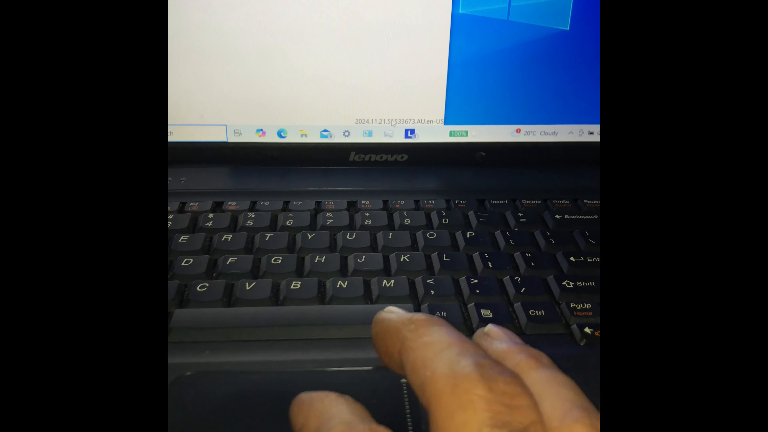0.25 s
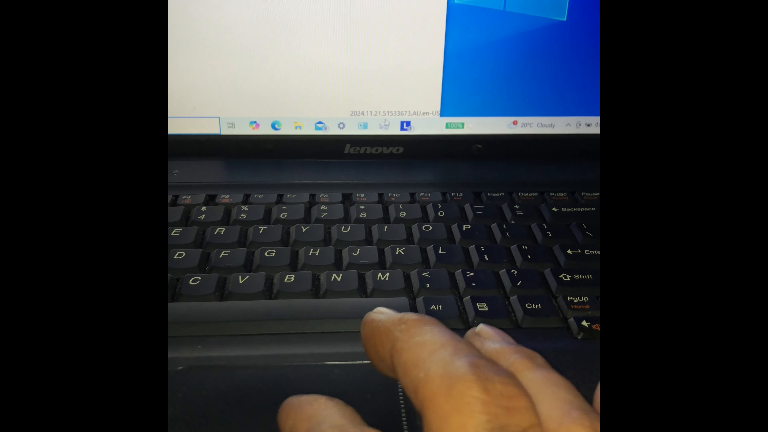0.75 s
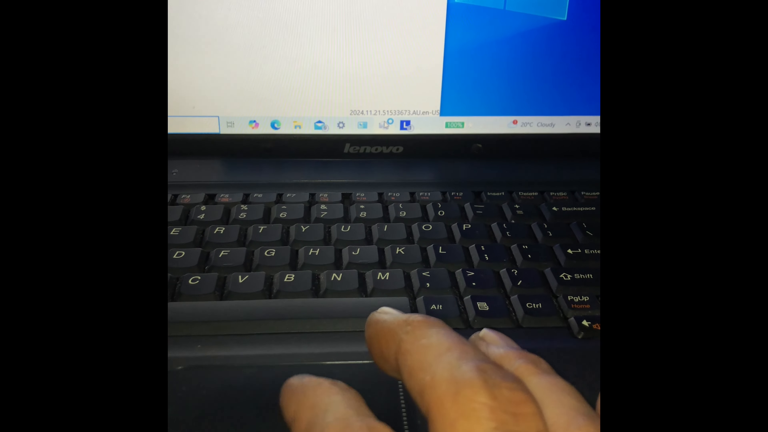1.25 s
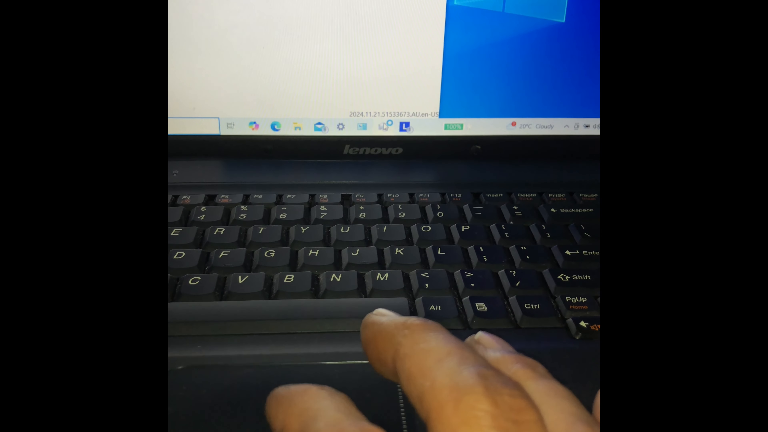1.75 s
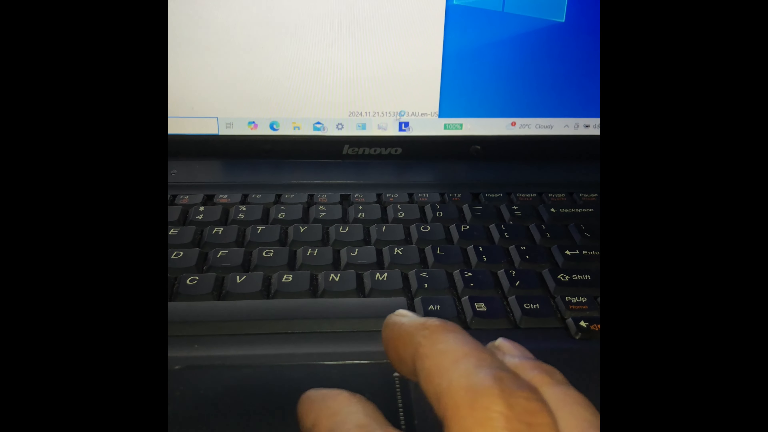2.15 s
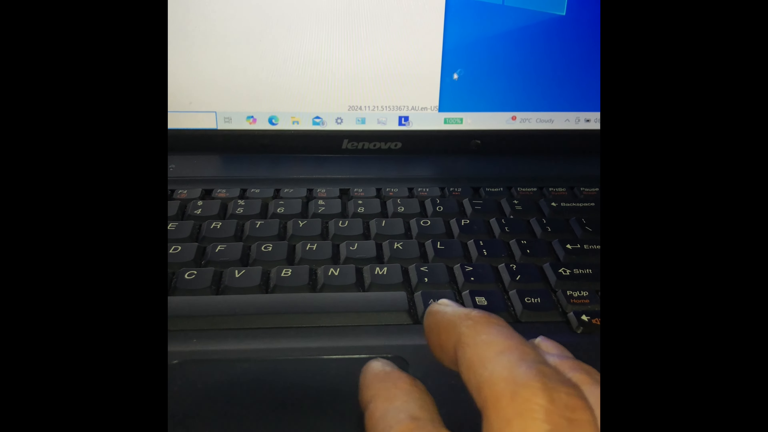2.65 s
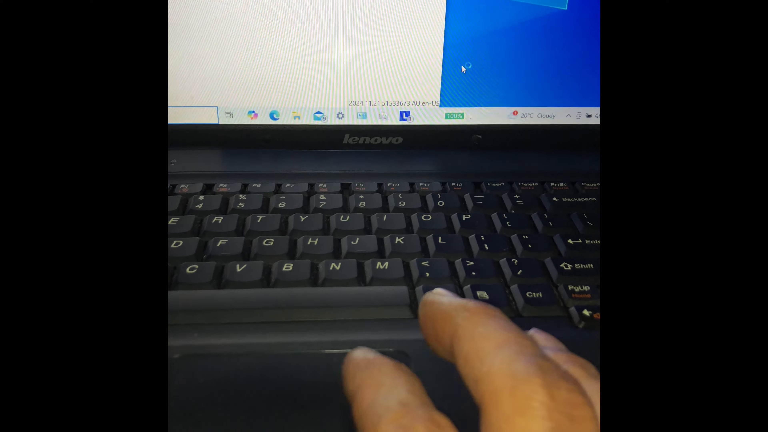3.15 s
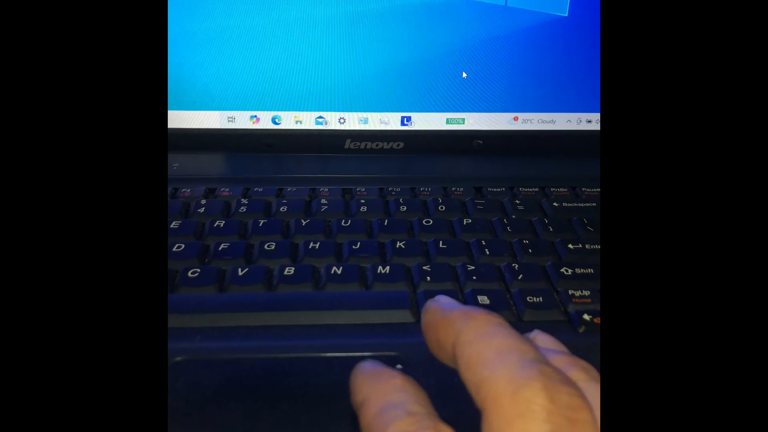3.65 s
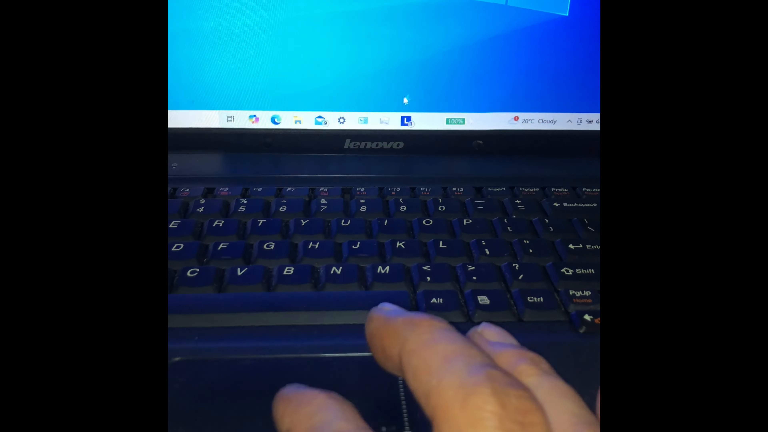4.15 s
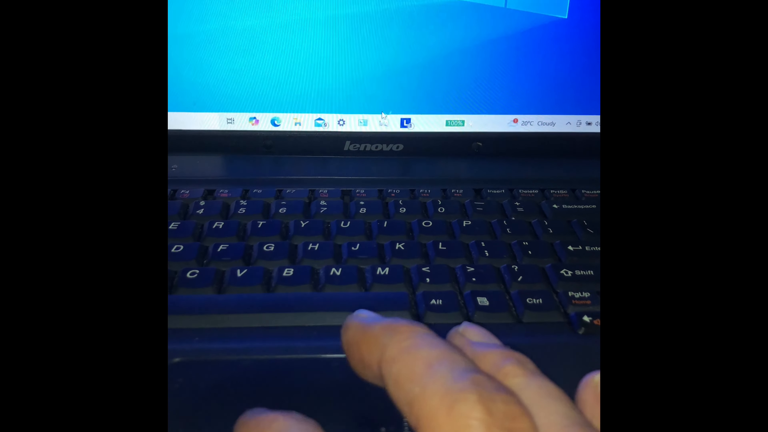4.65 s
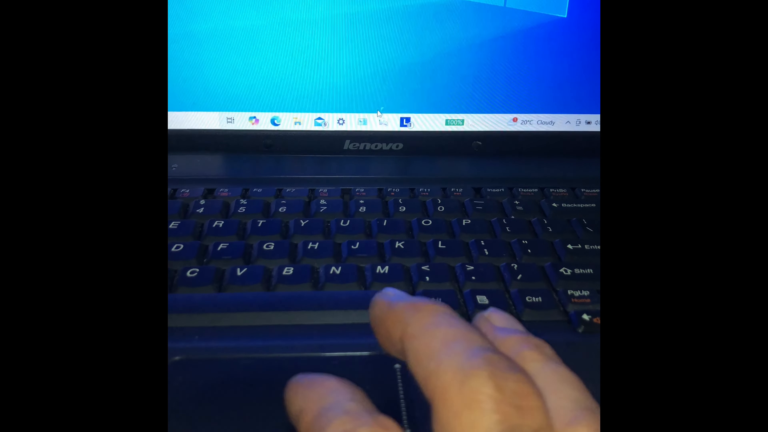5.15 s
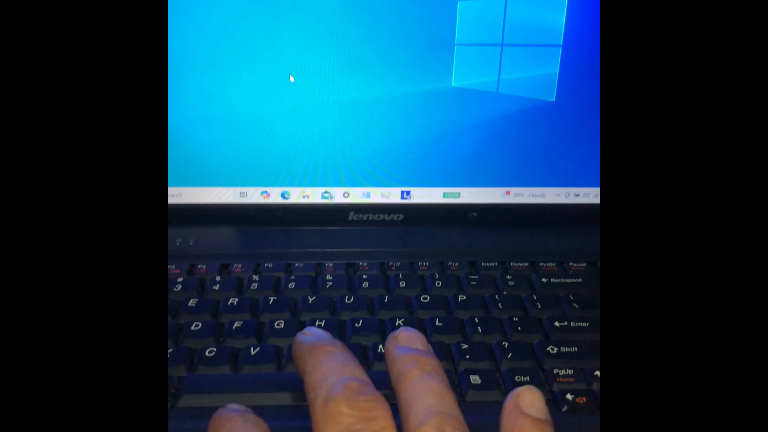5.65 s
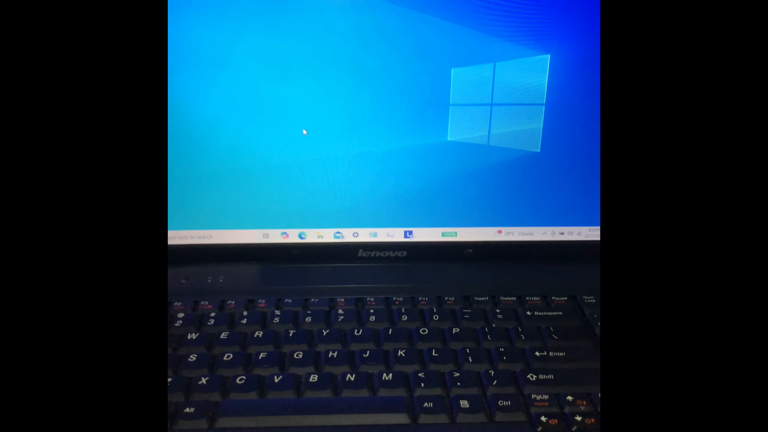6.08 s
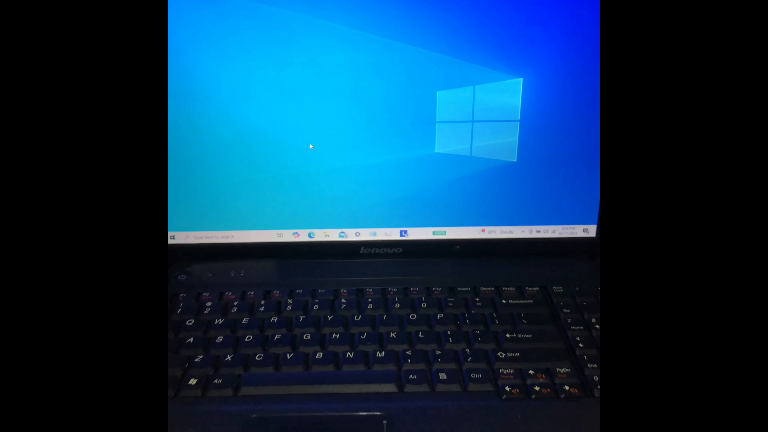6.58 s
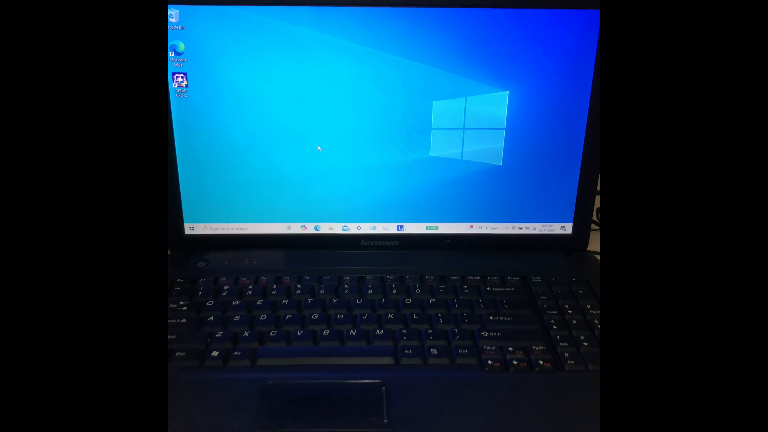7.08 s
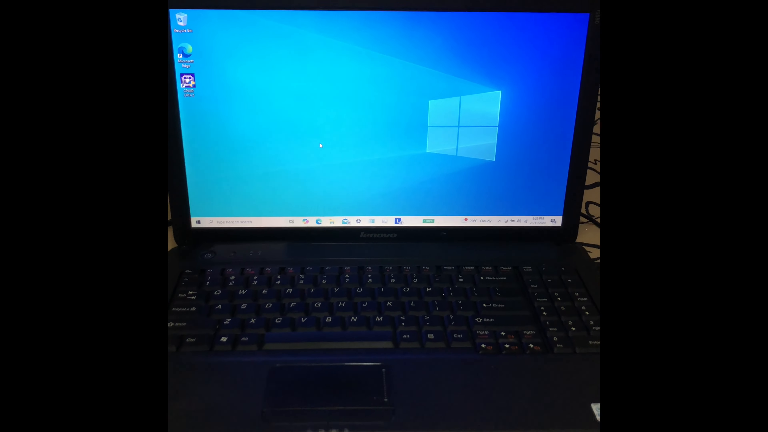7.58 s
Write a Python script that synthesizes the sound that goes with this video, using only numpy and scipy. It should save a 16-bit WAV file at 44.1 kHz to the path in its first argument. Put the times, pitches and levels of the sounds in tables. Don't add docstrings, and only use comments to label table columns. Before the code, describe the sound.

A constant small fan, captured by a nearby phone-like microphone indoors, blends breathy airflow, deep wavering drone, hum and a rough nasal whine. For the first five seconds almost nothing else happens beyond one faint click. Then cloth brushes in hissing strokes, loudest just after six seconds, followed by rapid knocky plastic creaks that thin out while the fan keeps running.

```python
import sys
import numpy as np
from scipy import signal
from scipy.fft import rfft, irfft
from scipy.io import wavfile
from scipy.ndimage import uniform_filter1d

SR = 44100
rng = np.random.default_rng(int(sys.argv[2]) if len(sys.argv) > 2 else 0)


def gain_from_db(level_db):
    decades = np.asarray(level_db, float) / 20
    return 10 ** decades


def wrap_up_sound(samples):
    columns = np.atleast_2d(samples).T
    tamed = np.clip(columns, -1, 1)
    steps = np.round(tamed * 32767).astype(np.int16)
    wavfile.write(sys.argv[1], SR, steps)


N = 344853


def level(x, db):
    return x * gain_from_db(db) / np.sqrt(np.mean(x ** 2))


def walk(rate):
    k = int(SR / rate)
    held = np.repeat(rng.standard_normal(N // 100), k)[:N + k]
    return 1.22 * uniform_filter1d(uniform_filter1d(held, k), k)[:N]


def coloured(table, modes=()):
    hz = np.arange(1, N // 2 + 2) * SR / N
    table_hz, table_db = np.array(table).T
    gain = gain_from_db(np.interp(np.log(hz), np.log(table_hz), table_db))
    for centre_hz, width_hz, lift_db in modes:
        gain = gain * gain_from_db(lift_db / (1 + (2 * (hz - centre_hz) / width_hz) ** 2))
    return irfft(rfft(rng.standard_normal(N)) * gain, N)


def leaning_back(t):
    return np.interp(t, (5.1, 7.3), (0, 1))


def air():
    # frequency in Hz, level in dB per Hz.
    bare_air = [(20, -46), (36, -33), (52, -18.5), (90, -11), (230, -6.5), (380, -19.5), (500, -24.5),
                (790, -28.5), (1050, -27), (1800, -30), (2150, -36), (3600, -36.5), (6000, -43.5),
                (15500, -56)]
    # frequency in Hz, width in Hz, lift in dB (negative for a
    resonances = [(53.7, 6.7, 10), (80.4, 6.7, 5.5), (131.3, 25.6, 10.5), (174, 11, -2), (335, 24.3, 6),
                  (443, 94, 2), (544.6, 17, 7.5), (612, 28, 3.5),
                  (1022, 28, 5), (1104, 49, 6), (1316, 27, 4.5), (1435, 42, 7.5), (1594, 75, 7.5),
              (1737, 29, 7.5), (1877, 37, 4), (2512, 33, 4), (3070, 110, 3.5), (4220, 1170, 2),
              (5320, 560, -1), (7500, 940, 1.5), (8700, 1200, -1.5), (10500, 2000, 0.5)]
    # time in seconds, lift in dB (negative for a
    surge_table = [(0.0, 1.5), (.37, -3), (.91, 2), (1.22, -4), (2.29, 4.5), (2.77, -3.5), (3.04, 3),
                   (4.0, -2), (4.36, 3.5), (5.06, -3), (5.86, 3), (7.01, 0), (7.4, 2.5), (7.6, -2),
                   (7.8, 8)]
    surge_s = 0.12
    ripple_db, ripple_hz = 1.1, 28

    rush = rfft(coloured(bare_air, resonances))
    hz = np.arange(len(rush)) * SR / N
    ripple = np.interp(hz, np.arange(2000) * ripple_hz, rng.standard_normal(2000))
    rush = rush * gain_from_db(ripple_db * ripple * (hz > 1900))

    drone = np.exp(-((hz - 135) / 30) ** 2)
    rumble = (1 - drone) * np.exp(-((hz - 250) / 100) ** 4)
    hiss = 1 - drone - rumble

    t = np.arange(N) / SR
    lean = leaning_back(t)
    surges = sum(db * np.exp(-((t - s) / surge_s) ** 2) for s, db in surge_table)
    drone_db = surges - surges.mean()
    rumble_db = -1.5 * lean + 0.86 * walk(3.06)
    hiss_db = -0.9 * lean + 0.16 * walk(2.6)
    out = gain_from_db(drone_db) * irfft(rush * drone, N)
    out = out + gain_from_db(rumble_db) * irfft(rush * rumble, N)
    out = out + gain_from_db(hiss_db) * irfft(rush * hiss, N)
    return level(out, -46)


def motor():
    # multiple of the magnetic pull, shaft turns added,
    # level in dB at rest, level in dB when the listener has leant back.
    hum = [
        (1, 0, -60.5, -61),
        (2, 0, -63, -61.5),
        (4, -1, -64, -70),
        (4, 0, -60.5, -63),
        (4, 1, -55.3, -53),
    ]
    # frequency in Hz, level in dB, wander in Hz.
    whistles = [(717.06, -81, .2), (882.5, -80.5, .2), (1623.3, -78, .6), (2088.4, -86, .5)]
    pull_hz, shaft_hz = 100.015, 22.11

    t = np.arange(N) / SR
    lean = leaning_back(t)
    pull = pull_hz * t + rng.random()
    shaft = shaft_hz * t + rng.random()
    out = 0
    for multiple, turns, near_db, far_db in hum:
        cycles = multiple * pull + turns * shaft
        tone_db = near_db + lean * (far_db - near_db) + 0.45 * walk(3.5)
        out = out + gain_from_db(tone_db) * np.sin(2 * np.pi * cycles)
    for hz, db, wander_hz in whistles:
        cycles = np.cumsum(hz + wander_hz * walk(1.47)) / SR
        out = out + gain_from_db(db + 2.0 * walk(1.8)) * np.sin(2 * np.pi * cycles)
    return np.sqrt(2) * out


def stroke(t, start_s, attack_s, hold_s, release_s):
    rise = np.sin(np.pi / 2 * np.clip((t - start_s) / attack_s, 0, 1)) ** 2
    return rise * np.exp(-np.maximum(t - start_s - attack_s - hold_s, 0) / release_s)


def sleeve():
    # frequency in Hz, level in dB per Hz.
    cloth = [(600, -20), (1300, 9), (2300, -4), (3500, 0.5), (6000, -2.5), (10000, -5.5), (13000, -9.5),
             (15500, -9.5)]
    # start in seconds, attack in seconds, hold in seconds,
    # release in seconds, level in dB above 5 kHz.
    strokes = [
        (5.05, 0.18, 0.18, .3, -76.5),
        (5.96, 0.22, .04, .25, -66),
        (6.15, 0.1, .02, 0.21, -64.5),
        (6.4, .2, 0.26, 0.063, -67),
        (6.79, .04, .01, .04, -69.5),
        (6.84, .05, .08, .1, -75.5),
    ]
    lift_s = (6.03, 6.33)
    hollow_width_hz = 150

    t = np.arange(N) / SR
    drag = np.sqrt(sum((gain_from_db(db) * stroke(t, *shape)) ** 2 for *shape, db in strokes))
    hollow_hz = np.interp(t, lift_s, (980, 1400))
    hollow_db = np.interp(t, lift_s, (9, -2))
    hiss = level(coloured(cloth) * gain_from_db(0.58 * walk(50)), 4.6)

    smooth = signal.butter(2, hollow_width_hz / 2, fs=SR, output="sos")
    breadth = signal.sosfilt(smooth, rng.standard_normal((2, N)))
    turn = 2 * np.pi * np.cumsum(hollow_hz) / SR
    hollow = level(breadth[0] * np.cos(turn) + breadth[1] * np.sin(turn), 0)
    return drag * (hiss + gain_from_db(hollow_db) * hollow)


def ring(hz, rise_s, decay_s, delay_s):
    t = np.maximum(np.arange(int(.03 * SR)) / SR - delay_s, 0)
    swell = (1 - np.exp(-t / rise_s)) ** 2 * np.exp(-t / decay_s)
    cycles = hz * t * (1 + 0.31 * np.exp(-t / 0.0022)) + rng.random()
    return swell / swell.max() * np.sin(2 * np.pi * cycles)


def creaks():
    # time in seconds, panel peak in dB, seam in dB relative to the panel, panel pitch in Hz.
    slips = [(3.514, -44, -21, 470), (5.483, -45, -15, 480), (5.962, -50, -14, 560), (6.359, -47, -9, 560),
             (6.417, -37.5, -11, 500), (6.444, -47, -7, 600), (6.461, -49, 0, 560),
             (6.553, -32.5, -11, 500), (6.598, -43, -15, 560), (6.664, -37, -16, 460),
             (6.759, -41, -12, 560), (6.869, -40, -8, 540), (6.927, -42, -13, 480), (6.948, -45, -11, 560),
             (7.127, -39.5, -10, 520), (7.17, -44, -14, 520), (7.181, -43, -17, 660),
             (7.204, -45, -16, 560), (7.282, -52, 0, 800), (7.379, -41, -16, 520), (7.754, -48, -12, 470)]
    out = np.zeros(N + SR)
    for s, panel_db, seam_db, panel_hz in slips:
        seam_hz = 1180 * (1 + 0.03 * rng.standard_normal())
        seam = gain_from_db(seam_db + 2) * ring(seam_hz, 0.0012, 0.0019, 0)
        panel = ring(panel_hz, 0.00074, 0.0019, 0.00148)
        creak = seam + panel
        i = int((s - .0006) * SR)
        out[i:i + len(creak)] += gain_from_db(panel_db) * creak
    return out[:N]


def scene():
    return (air() + motor() + sleeve() + creaks())[None]


def low_pass(x):
    return signal.sosfilt(signal.butter(12, 15710, fs=SR, output="sos"), x)


def record(dry):
    return low_pass(dry)


dry = scene()
out = record(dry)
wrap_up_sound(out)
```